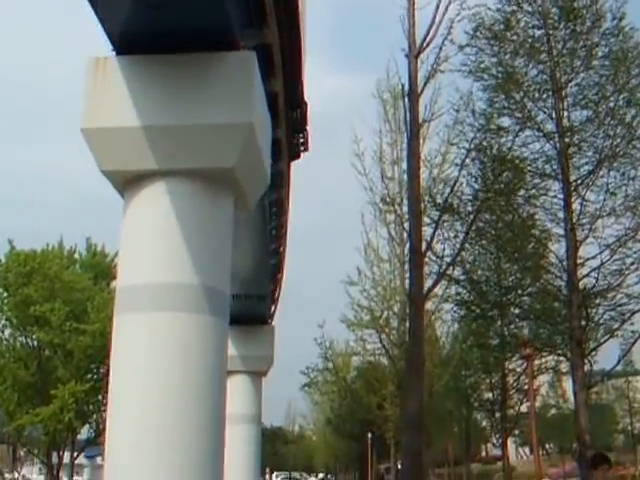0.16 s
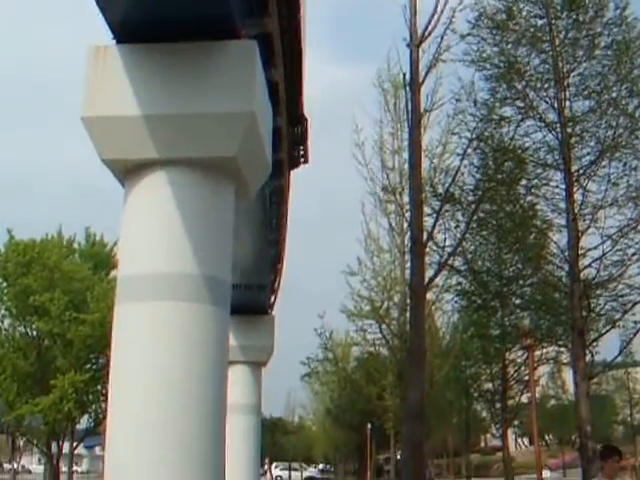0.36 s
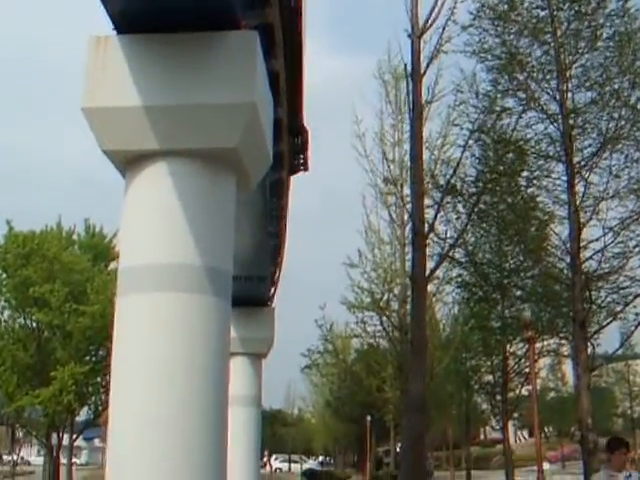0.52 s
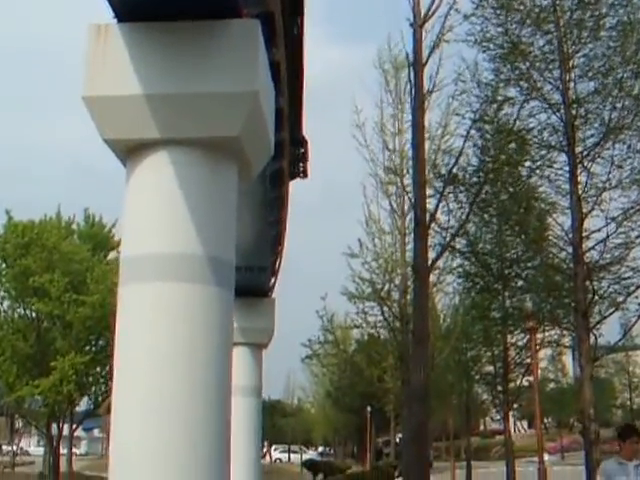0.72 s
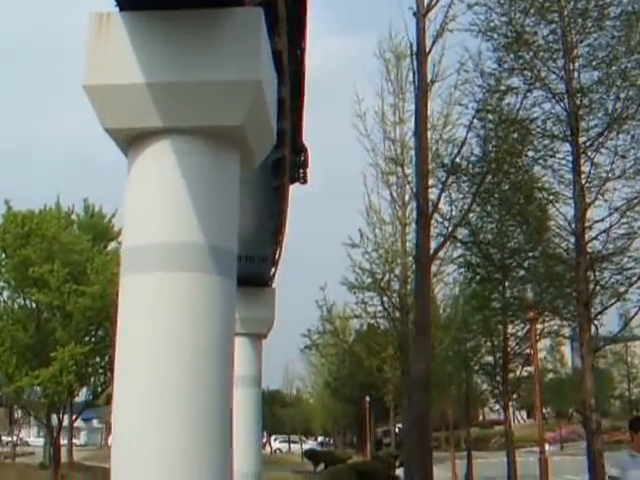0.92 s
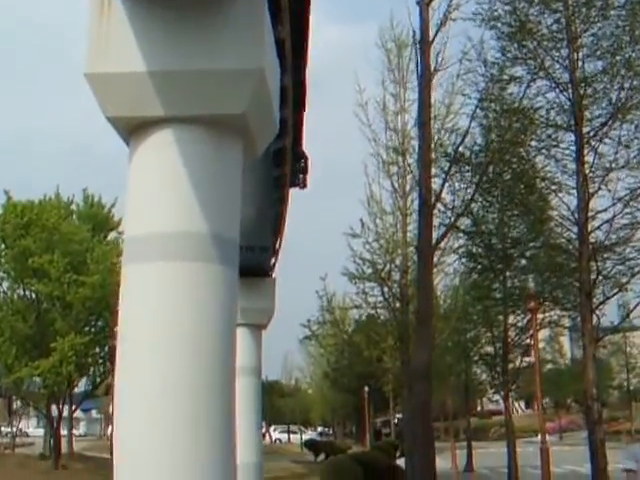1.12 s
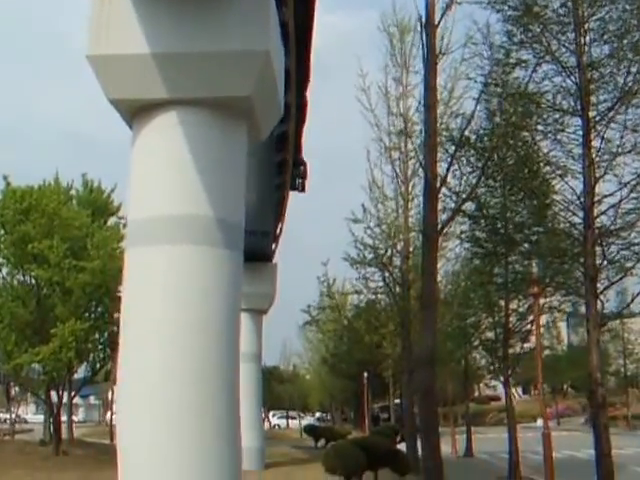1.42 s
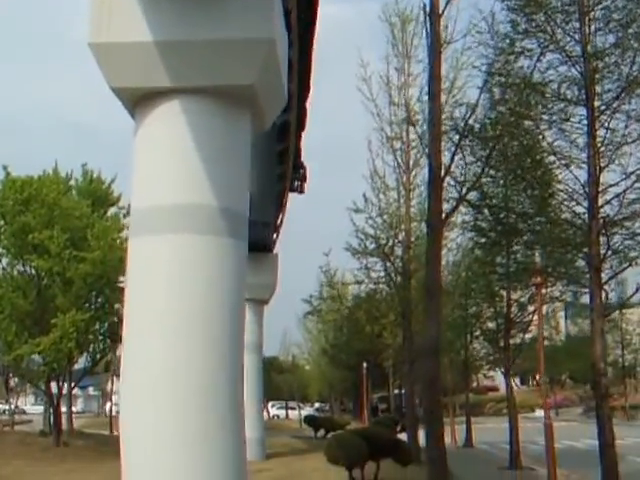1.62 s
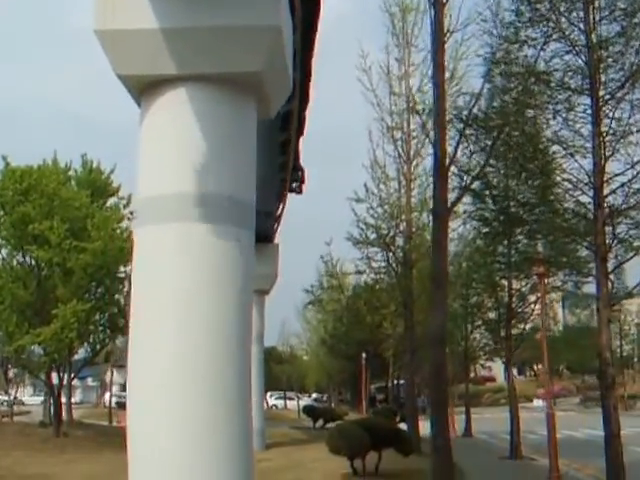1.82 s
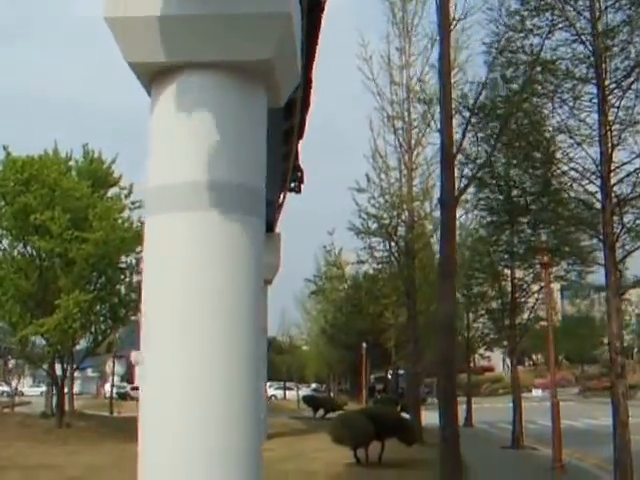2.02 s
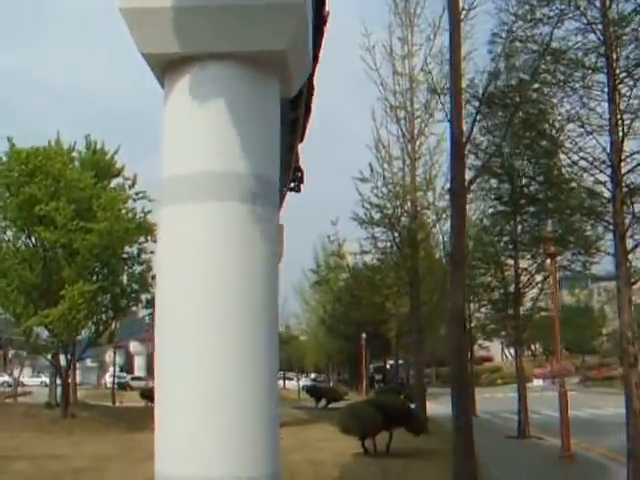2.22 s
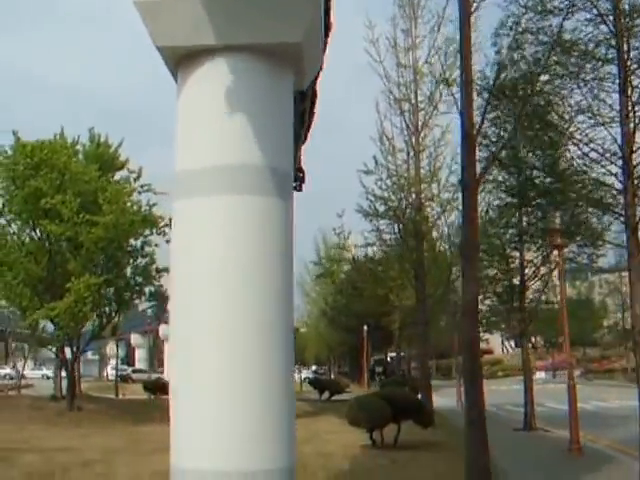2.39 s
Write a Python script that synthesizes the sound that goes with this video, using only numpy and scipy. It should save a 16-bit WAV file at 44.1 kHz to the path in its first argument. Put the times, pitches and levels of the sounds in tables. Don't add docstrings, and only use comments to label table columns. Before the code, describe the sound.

A levitating train's high, warbling electrical whine rings over steady low hum and faint air hiss.

```python
import sys
import numpy as np
from scipy import signal
from scipy.fft import rfft, irfft
from scipy.io import wavfile
from scipy.ndimage import uniform_filter1d

SR = 44100
rng = np.random.default_rng(int(sys.argv[2]) if len(sys.argv) > 2 else 0)


def materialize(psi):
    bounded = np.clip(np.atleast_2d(psi).T, -1, 1)
    quanta = np.round(bounded * 32767).astype(np.int16)
    wavfile.write(sys.argv[1], SR, quanta)


def elevation(decibels):
    levels = np.asarray(decibels, float)
    return 10 ** (levels / 20)


N = 112454


def level(x, db):
    return x * elevation(db) / np.sqrt(np.mean(x ** 2))


def curve(table, axis=1):
    points = np.array(table)
    return np.interp(np.arange(N) / SR, points[:, 0], points[:, axis])


def walk(rate_hz):
    hold = int(SR / rate_hz)
    held = rng.standard_normal(400)[np.arange(N) // hold % 400]
    slewed = uniform_filter1d(uniform_filter1d(held, hold), hold)
    return slewed / slewed.std()


def resonance(hz, width_hz):
    b, a = signal.iirpeak(hz, hz / width_hz, fs=SR)
    return level(signal.lfilter(b, a, rng.standard_normal(N)), 0)


def converters():
    # (time [s], level [dB], brightness [dB per multiple], lean to the high limit [dB])
    whine = [(0.0, -30, 0.5, -3.5), (0.01, -29.5, 1.5, -4.5), (0.08, -25, -3.5, -4.5), (0.1, -29, 0.5, -3),
             (0.22, -28.5, -0.5, -0.5), (0.25, -27, -1, 3.5), (0.43, -32, 2, 0.0), (0.46, -27.5, 0.5, -3.5),
             (0.49, -30, 1.5, 1.5), (0.81, -26.5, -1.5, 0.0), (1.08, -30.5, 1, 0.0), (1.32, -27, -1, -3),
             (1.6, -30.5, 1, 4), (1.87, -28.5, -0.5, -2.5), (2.12, -31, 1, 1.5), (2.38, -29, -0.5, -5),
             (2.53, -32.5, -1, -5.5), (2.55, -42, 3.5, -1)]
    # (multiple of the switching rate, level [dB], tilt from low to high limit [dB])
    multiples = [(1, 2, -1.5), (2, -5, -0.5), (3, -9.5, 3), (4, -54.5, 22.5)]
    count = 6
    low_hz, high_hz = 2103.2, 2502.3
    sweeps_per_s, pace_spread, pace_wander, wander_hz = 20, .25, .35, 14
    bend = 0.9284
    detune, jitter_hz, jitter_rate_hz = .007, 14.11, 150
    flutter_db, flutter_hz = 1.15, 30
    echo_turn_hz = 2.0

    brightness_db, lean_db = curve(whine, axis=2), curve(whine, axis=3)
    drift = 2 * np.pi * echo_turn_hz * np.arange(N) / SR
    out = 0
    for pace in np.linspace(-1, 1, num=count):
        sweep_hz = sweeps_per_s * np.exp(pace_spread * pace + pace_wander * walk(wander_hz))
        turn = 2 * np.pi * (np.cumsum(sweep_hz) / SR + rng.random())
        place = np.arcsin(bend * np.sin(turn)) / np.arcsin(bend) / 2
        hz = (low_hz + high_hz) / 2 + (high_hz - low_hz) * place
        trembling_hz = hz * (1 + detune * pace) + jitter_hz * walk(jitter_rate_hz)
        phase = 2 * np.pi * np.cumsum(trembling_hz) / SR
        frame = 0
        for multiple, db, tilt_db in multiples:
            tone_db = db + (tilt_db + lean_db) * place + (multiple - 1) * brightness_db
            frame = frame + elevation(tone_db) * np.sin(multiple * phase)
        frame = frame * elevation(flutter_db * walk(flutter_hz))
        out = out + frame + echo(frame * np.cos(drift + pace)) + echo(frame * np.sin(drift + pace))
    return level(out, 0) * elevation(curve(whine))


def echo(x):
    t60_s, echo_db = 0.23, 4.5
    t = np.arange(SR // 3) / SR
    scatter = rng.standard_normal(len(t)) * elevation(-60 * t / t60_s)
    tail = level(scatter, echo_db) / np.sqrt(len(t))
    led_in = np.concatenate([x[:len(t)][::-1], x])
    return signal.oaconvolve(led_in, tail)[len(t):len(t) + N]


def air():
    # (frequency [Hz], width [Hz], level [dB])
    hiss = [(3500, 620, -0.5), (5600, 1100, -5), (7670, 1500, 0), (7950, 300, -5.5)]
    # (time [s], level [dB])
    hiss_level = [
        (0.0, -53),
        (0.35, -50),
        (1.46, -48),
        (1.74, -46),
        (2.24, -44),
        (2.41, -49),
        (2.55, -58.5),
    ]
    out = 0
    for hz, width_hz, db in hiss:
        out = out + elevation(db + 0.37 * walk(7.9)) * resonance(hz, width_hz)
    return elevation(curve(hiss_level)) * out


def ticks():
    # (time [s], peak level [dB], centre [Hz], decay t60 [s], snap level [dB])
    rustles = [
        (.255, -35, 3500, 0.11, -7),
        (0.48, -29, 3920, 0.063, 2.5),
        (1.832, -37, 3270, .04, -1),
        (1.842, -30, 3660, 0.058, 2),
        (1.862, -31, 3660, .04, -5),
        (2.157, -26, 4860, 0.086, 1),
        (2.372, -32, 3550, .08, 4),
    ]
    rise_s, snap_t60_s = 0.0013, .012
    hiss_db, narrow_hz, wide_db = -4.5, 1100, -4.5

    t = np.arange(N) / SR
    wide = resonance(3000, 3500)
    out = 0
    for at, db, hz, t60_s, snap_db in rustles:
        age = np.maximum(t - at, 0)
        shape = np.minimum(age / rise_s, 1) * elevation(-60 * age / t60_s)
        snap = (age > 0) * elevation(snap_db - 60 * age / snap_t60_s) * np.sin(2 * np.pi * hz * age)
        hiss = shape * (resonance(hz, narrow_hz) + elevation(wide_db) * wide)
        out = out + elevation(db) * (snap + elevation(hiss_db) * hiss)
    return out


def wind():
    # (time [s], level [dB], length [s], pitch [Hz])
    bumps = [
        (1.16, -40, 0.017, 70),
        (1.97, -46, .025, 35),
        (2.143, -38, .028, 45),
        (2.31, -45, 0.04, 65.4),
        (2.413, -41, .025, 39.7),
        (2.444, -38.5, 0.026, 89),
        (2.48, -40, .03, 38),
        (2.54, -37, .03, 30),
    ]
    wind_db, wind_hz, width_hz = -58, 38, 60
    gust_db, gust_hz = 2.5, 4.5

    t = np.arange(N) / SR
    b, a = signal.butter(2, 2 * wind_hz, fs=SR)
    low = signal.lfilter(b, a, resonance(wind_hz, width_hz))
    out = level(low, wind_db) * elevation(gust_db * walk(gust_hz))
    for at, db, length_s, hz in bumps:
        bump = np.exp(-((t - at) / length_s) ** 2) * np.cos(2 * np.pi * hz * (t - at))
        out = out - 2 * elevation(db) * bump
    return out


def hum():
    # (frequency [Hz], density [dB per Hz])
    colour_points = [(25, -17.5), (90, -12.5), (140, -6.5), (350, -7), (700, -15), (1800, -23.5),
                     (3000, -29.5), (9000, -26.5)]
    # (time [s], level [dB])
    hum_level = [
        (0.0, -37),
        (0.36, -37),
        (0.38, -40.5),
        (0.39, -37),
        (2.48, -39),
        (2.55, -38),
    ]
    # (frequency [Hz], width [Hz], level [dB])
    body = [(129.8, 12, -46.5), (147.5, 12.5, -41), (203.8, 9.8, -48.5), (278.6, 19, -45), (366.2, 11, -44)]
    hum_db, swell_db, flicker_db, body_flicker_db = 6, 0.22, 0.6, 2

    f = np.fft.rfftfreq(N, 1 / SR) + 1
    points = np.array(colour_points)
    colour = elevation(np.interp(np.log(f), np.log(points[:, 0]), points[:, 1]))
    swell = walk(1.46)
    noise = 0
    for step in range(27):
        share = np.cos(np.pi / 2 * np.clip(3 * np.log2(f / 25) - step, -1, 1))
        band = irfft(rfft(rng.standard_normal(N)) * colour * share, N)
        noise = noise + band * elevation(swell_db * swell + flicker_db * walk(11.8))
    out = level(noise, hum_db) * elevation(curve(hum_level))
    for hz, width_hz, db in body:
        out = out + elevation(db + body_flicker_db * walk(6.4)) * resonance(hz, width_hz)
    return out


def scene():
    return (converters() + air() + ticks() + wind() + hum())[None]


def band_limit(x):
    return signal.sosfilt(signal.butter(12, 8960, fs=SR, output="sos"), x)


def record(dry):
    camera_rate_hz = 16000
    guard_hz, roll_hz, top_hz = 7970, 7500, 8550
    offset = -.0024

    taken = signal.sosfilt(signal.ellip(10, .5, 60, guard_hz, fs=SR, output="sos"), dry)
    mirrored = taken * (1 + 2 * np.cos(2 * np.pi * camera_rate_hz * np.arange(N) / SR))
    soft = signal.sosfilt(signal.butter(12, roll_hz, fs=SR, output="sos"), mirrored)
    cut = signal.sosfilt(signal.ellip(8, .5, 80, top_hz, fs=SR, output="sos"), soft)
    return band_limit(cut + offset)


dry = scene()
out = record(dry)
materialize(out)
```